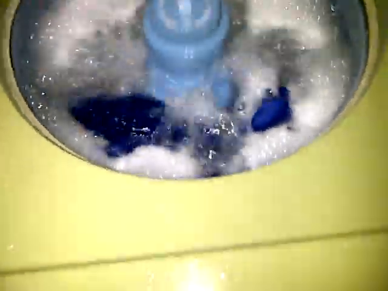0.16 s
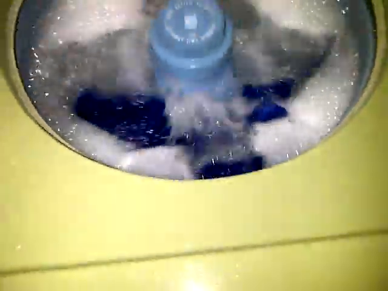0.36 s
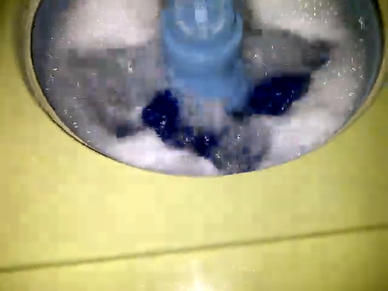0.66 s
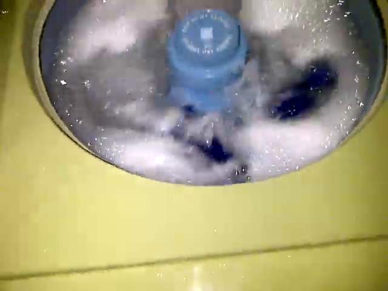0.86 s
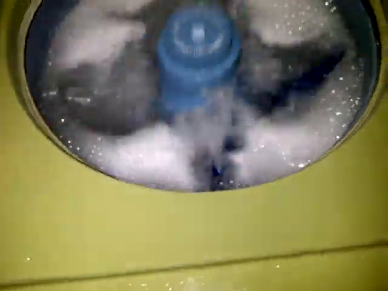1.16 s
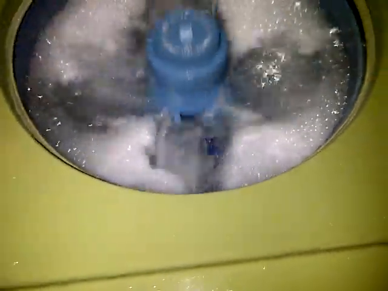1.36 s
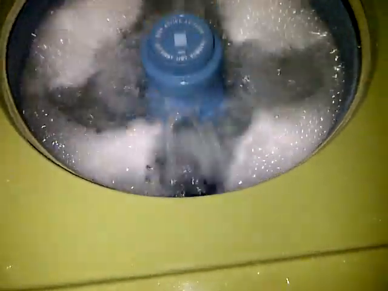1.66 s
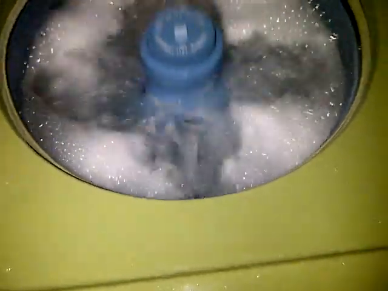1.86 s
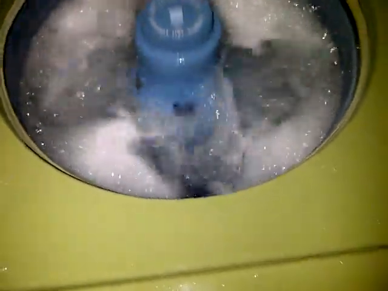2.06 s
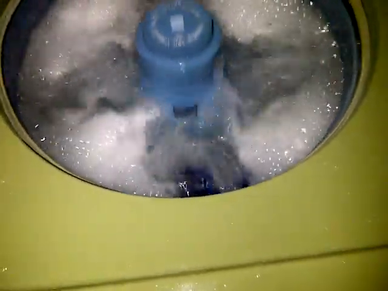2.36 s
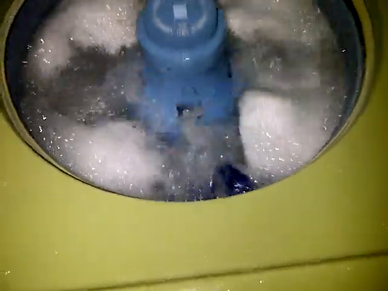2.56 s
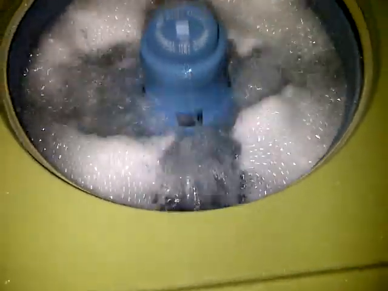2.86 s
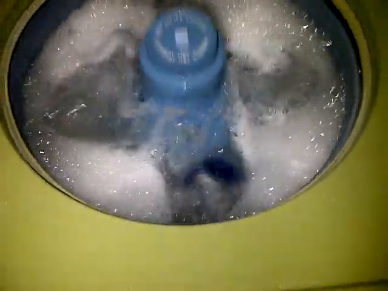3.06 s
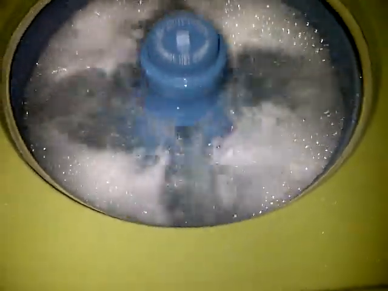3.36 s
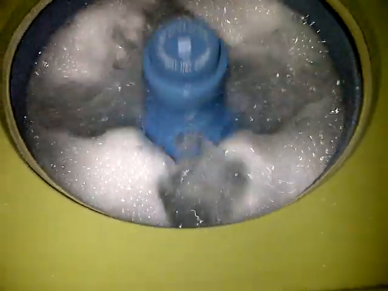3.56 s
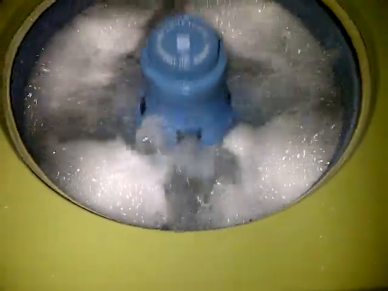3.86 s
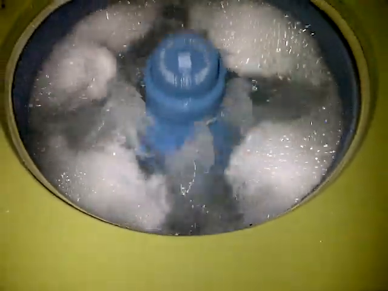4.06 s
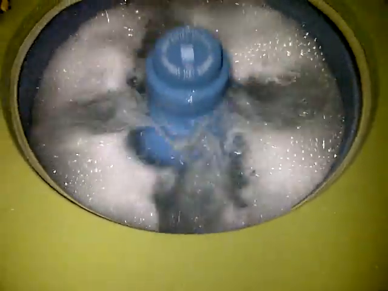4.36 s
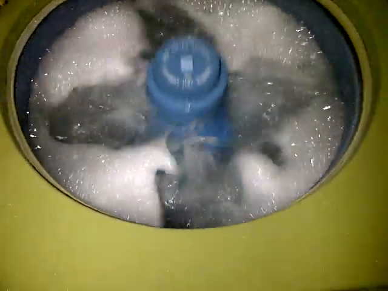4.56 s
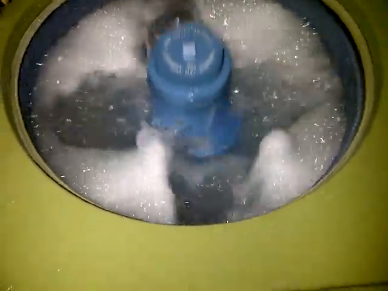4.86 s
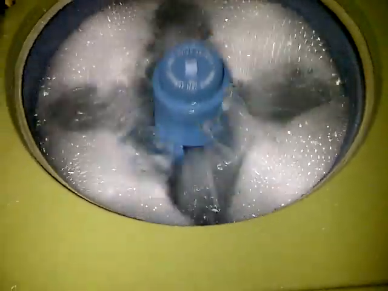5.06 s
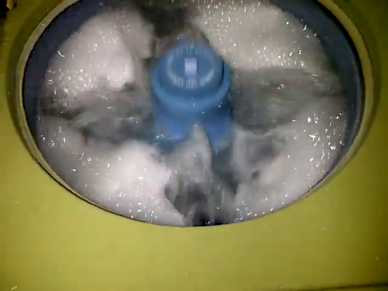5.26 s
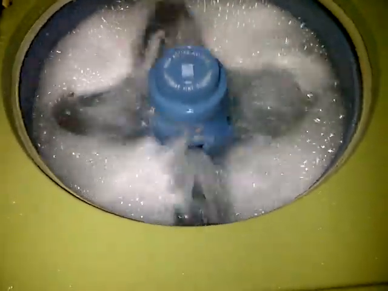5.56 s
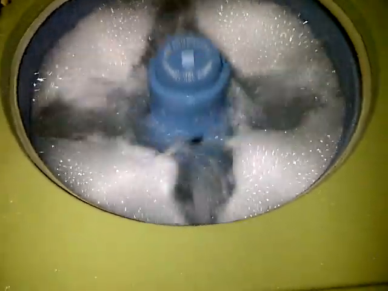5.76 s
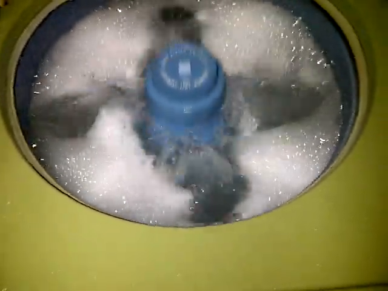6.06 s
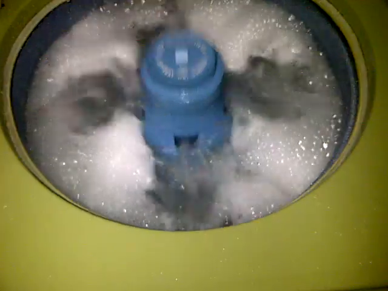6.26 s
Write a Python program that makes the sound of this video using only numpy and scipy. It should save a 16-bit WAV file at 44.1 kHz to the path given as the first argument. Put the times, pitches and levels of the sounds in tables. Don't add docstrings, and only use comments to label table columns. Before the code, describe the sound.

Close above an open washing machine tub, the agitator reverses about six times a second. Each stroke slaps up a short burst of spray and ringing droplets, followed by hollow glugs and small plops. Froth fizzes between strokes while a low gear drone and faint soft thumps continue underneath. Small indoor space, dull band-limited phone sound, steady from start to end.

```python
import sys
import numpy as np
from scipy import signal
from scipy.fft import rfft, irfft
from scipy.io import wavfile
from scipy.ndimage import uniform_filter1d

SR = 44100
rng = np.random.default_rng(int(sys.argv[2]) if len(sys.argv) > 2 else 0)


def nominal_scale(level):
    x = np.asarray(level, float) / 20
    return 10 ** x


def master_out(mix):
    frames = np.transpose(np.atleast_2d(mix))
    ceiling = np.clip(frames, -1, 1)
    pcm = np.round(ceiling * 32767).astype(np.int16)
    wavfile.write(sys.argv[1], SR, pcm)


N = 282681

# (time [s], peak level [dB], loudest droplet pitch [Hz], length [s],
# mist above 4.5 kHz [dB])
SPLASHES = [(0.099, -10.5, 1880, 0.028, -13), (0.163, -13.5, 1660, 0.025, -14),
            (0.237, -18, 2370, 0.018, -15), (0.2455, -13.5, 3470, 0.025, -10),
            (0.411, -15.5, 5680, 0.014, -14.5), (0.428, -7, 1500, 0.02, -6.5),
            (0.492, -16.5, 3200, 0.026, -11), (0.5758, -4.5, 1780, 0.026, -11.5),
            (0.681, -23, 2410, 0.02, -12.5), (0.71, -16, 2540, 0.015, -20.5),
            (0.739, -16, 2400, 0.019, -15), (0.7513, -11.5, 1900, 0.018, -20),
            (0.793, -20.5, 3840, 0.014, -18), (0.82, -15.5, 3220, 0.02, -10.5),
            (0.903, -8.5, 1550, 0.026, -13.5), (0.945, -22, 3100, 0.014, -15),
            (0.9745, -12.5, 4420, 0.017, -21), (0.998, -20, 2580, 0.015, -18),
            (1.058, -8, 2300, 0.027, -18), (1.096, -19.5, 1860, 0.014, -23.5),
            (1.204, -20, 2030, 0.02, -12), (1.2256, -8, 2470, 0.028, -13.5),
            (1.288, -16, 3970, 0.029, -12.5), (1.36, -22.5, 2950, 0.023, -2),
            (1.3714, -24, 3630, 0.019, -7), (1.3846, -7.5, 1600, 0.015, -22.5),
            (1.548, -6.5, 3040, 0.02, -15), (1.5743, -13.5, 2380, 0.02, -22.5),
            (1.708, -11, 2750, 0.027, -11.5), (1.846, -20.5, 3250, 0.024, -12),
            (1.873, -12.5, 2890, 0.013, -12), (1.8779, -7.5, 2310, 0.024, -16),
            (2.012, -20, 2450, 0.02, -6), (2.0197, -13.5, 3000, 0.02, -9), (2.043, -14, 2930, 0.02, -19.5),
            (2.1131, -16, 3550, 0.02, -17.5), (2.178, -16, 2400, 0.013, -15.5),
            (2.195, -9.5, 2430, 0.02, -12.5), (2.34, -17.5, 2950, 0.018, -8.5),
            (2.368, -7.5, 4060, 0.013, -12), (2.4363, -16, 2470, 0.02, -11), (2.5214, -8, 1840, 0.029, -10),
            (2.585, -23.5, 2580, 0.02, -6), (2.598, -13, 3700, 0.022, -4.5), (2.658, -21, 3300, 0.02, -21),
            (2.681, -9, 1580, 0.016, -11), (2.7047, -12.5, 1530, 0.024, -21), (2.826, -26, 1830, 0.02, 1.5),
            (2.837, -14, 4300, 0.014, -5), (2.8436, -17.5, 1680, 0.016, -22),
            (2.865, -11, 2960, 0.015, -20.5), (2.922, -16.5, 2000, 0.027, -4.5),
            (2.9926, -15.5, 2880, 0.016, -13.5), (3.0063, -4.5, 1970, 0.013, -10),
            (3.087, -15.5, 3400, 0.022, -13), (3.127, -20.5, 2730, 0.017, -25),
            (3.1795, -20.5, 2260, 0.023, -12), (3.1845, -12.5, 2740, 0.02, -6.5),
            (3.252, -19, 2220, 0.02, -6.5), (3.3288, -6, 1950, 0.02, -13),
            (3.4344, -16.5, 2400, 0.023, -8.5), (3.502, -11, 2960, 0.015, -14.5),
            (3.6615, -5.5, 3080, 0.022, -11.5), (3.7416, -12.5, 4450, 0.026, -15),
            (3.8314, -6, 1910, 0.015, -17.5), (3.871, -38, 2020, 0.02, -12),
            (3.907, -21.5, 1630, 0.017, -21), (3.983, -7, 2220, 0.026, -10.5),
            (4.015, -12.5, 1940, 0.022, -27), (4.0622, -18, 2980, 0.022, -4.5),
            (4.1475, -9.5, 2340, 0.013, -21), (4.224, -16, 3010, 0.015, -14),
            (4.315, -5.5, 2500, 0.018, -16.5), (4.381, -15.5, 3520, 0.024, -16.5),
            (4.4696, -11, 2700, 0.022, -14.5), (4.502, -7.5, 1660, 0.018, -25.5),
            (4.559, -17.5, 3850, 0.014, -7), (4.642, -6.5, 1530, 0.02, -12),
            (4.666, -11.5, 1700, 0.014, -21), (4.7076, -12, 1860, 0.02, -11),
            (4.774, -19.5, 2040, 0.018, -3.5), (4.789, -10.5, 3100, 0.017, -14),
            (4.855, -16.5, 1960, 0.018, -15.5), (4.968, -4.5, 3120, 0.023, -20),
            (5.049, -16.5, 3200, 0.017, -6), (5.1182, -4, 2200, 0.025, -12.5),
            (5.193, -20, 1540, 0.014, -5.5), (5.263, -16.5, 2640, 0.02, -23.5),
            (5.28, -9.5, 2360, 0.016, -13.5), (5.301, -7, 1720, 0.016, -26.5),
            (5.344, -14.5, 1900, 0.018, -17), (5.4504, -8, 1600, 0.023, -16.5),
            (5.535, -24, 1530, 0.02, -4), (5.6064, -8.5, 1780, 0.024, -20),
            (5.6867, -12.5, 4240, 0.014, -11), (5.7725, -10.5, 2500, 0.016, -20.5),
            (5.782, -20.5, 3050, 0.018, -15), (5.7954, -9, 1580, 0.016, -24), (5.937, -7, 1560, 0.02, -21),
            (5.985, -20.5, 3900, 0.02, -11), (6.01, -31, 4130, 0.017, -18), (6.096, -27, 2150, 0.022, -13),
            (6.105, -10, 1690, 0.022, -28.5), (6.179, -16.5, 1800, 0.015, -26.5),
            (6.257, -2.5, 4260, 0.024, -15), (6.3616, -18, 2980, 0.015, -16.5)]
# (time [s], peak level [dB], pitch [Hz], t60 [s])
AIR_POCKETS = [(0.027, -16, 440, 0.068), (0.097, -14, 455, 0.06), (0.116, -9, 776, 0.093),
               (0.17, -13, 997, 0.1), (0.213, -12, 644, 0.076), (0.25, -11, 594, 0.027),
               (0.291, -13.5, 630, 0.14), (0.415, -12.5, 437, 0.14), (0.447, -4, 705, 0.036),
               (0.481, -14, 570, 0.074), (0.576, -21, 439, 0.026), (0.629, -9.5, 460, 0.034),
               (0.672, -8, 523, 0.024), (0.741, -9, 590, 0.09), (0.755, -6, 580, 0.031),
               (0.768, -4.5, 530, 0.032), (0.816, -17, 766, 0.043), (1.057, -15.5, 583, 0.17),
               (1.211, -35, 366, 0.07), (1.228, -8, 460, 0.052), (1.269, -13, 605, 0.054),
               (1.328, -15, 440, 0.069), (1.386, -13.5, 566, 0.076), (1.412, -10.5, 580, 0.12),
               (1.46, -10.5, 640, 0.048), (1.55, -19, 430, 0.06), (1.57, -11.5, 634, 0.06),
               (1.715, -9, 530, 0.038), (1.731, -8.5, 832, 0.11), (1.797, -13.5, 810, 0.045),
               (1.896, -9.5, 454, 0.047), (1.92, -22, 447, 0.037), (2.041, -14.5, 675, 0.12),
               (2.088, -13.5, 455, 0.084), (2.203, -6, 430, 0.073), (2.336, -17, 450, 0.039),
               (2.36, -13, 454, 0.17), (2.52, -19, 540, 0.047), (2.558, -13.5, 526, 0.046),
               (2.597, -13.5, 400, 0.039), (2.706, -25, 447, 0.06), (2.763, -18.5, 470, 0.084),
               (2.857, -5, 700, 0.039), (2.884, -4, 646, 0.065), (2.931, -7.5, 517, 0.03),
               (3.03, -16.5, 664, 0.07), (3.138, -16, 350, 0.052), (3.177, -7, 576, 0.049),
               (3.208, -10, 643, 0.06), (3.25, -16.5, 600, 0.097), (3.331, -30, 470, 0.06),
               (3.503, -10, 570, 0.06), (3.511, -12.5, 1000, 0.052), (3.572, -8.5, 730, 0.039),
               (3.631, -17, 640, 0.038), (3.667, -10, 410, 0.054), (3.688, -7, 662, 0.056),
               (3.742, -13, 500, 0.047), (3.826, -13, 555, 0.16), (3.899, -10, 920, 0.02),
               (3.975, -10, 746, 0.024), (4.061, -14.5, 635, 0.08), (4.15, -10.5, 455, 0.067),
               (4.176, -9, 840, 0.05), (4.231, -17.5, 520, 0.18), (4.318, -8.5, 439, 0.1),
               (4.47, -5.5, 455, 0.034), (4.501, -13.5, 635, 0.1), (4.535, -11.5, 662, 0.099),
               (4.638, -15.5, 482, 0.041), (4.662, -4.5, 544, 0.025), (4.716, -15, 430, 0.06),
               (4.795, -13, 430, 0.11), (4.839, -10.5, 443, 0.089), (4.968, -9, 740, 0.06),
               (5.104, -31, 496, 0.055), (5.121, -15, 523, 0.14), (5.192, -8, 530, 0.044),
               (5.286, -14.5, 285, 0.036), (5.286, -20, 675, 0.048), (5.308, -12.5, 744, 0.096),
               (5.46, -21, 1290, 0.06), (5.461, -10, 438, 0.074), (5.476, -5.5, 515, 0.047),
               (5.531, -12.5, 627, 0.055), (5.593, -18, 450, 0.096), (5.609, -9.5, 441, 0.064),
               (5.651, -8.5, 602, 0.067), (5.684, -11.5, 840, 0.052), (5.739, -14, 420, 0.072),
               (5.775, -10.5, 537, 0.078), (5.824, -7, 450, 0.023), (5.847, -16.5, 456, 0.042),
               (5.932, -12, 452, 0.1), (5.963, -11.5, 823, 0.073), (5.999, -15.5, 1050, 0.048),
               (6.018, -13.5, 440, 0.065), (6.096, -3.5, 460, 0.034), (6.256, -10.5, 455, 0.14),
               (6.345, -8.5, 644, 0.035)]
# (time [s], peak level [dB], pitch [Hz], t60 [s])
WAKE_POCKETS = [(0.422, -19, 999, 0.034), (1.06, -14, 1084, 0.045), (1.294, -19, 1090, 0.046),
                (1.389, -16, 1200, 0.059), (1.413, -9, 880, 0.033), (1.552, -15, 1020, 0.05),
                (1.716, -12, 1080, 0.037), (1.882, -21, 1204, 0.04), (2.682, -16, 1190, 0.04),
                (2.855, -22, 790, 0.032), (3.008, -23, 1130, 0.04), (3.177, -21, 1150, 0.033),
                (3.251, -15, 1120, 0.045), (3.513, -10, 1050, 0.063), (3.666, -21, 1340, 0.043),
                (3.9, -11, 885, 0.048), (3.988, -11, 814, 0.05), (4.639, -14, 1150, 0.035),
                (5.144, -13, 1140, 0.034), (5.287, -17, 1070, 0.029), (5.478, -12, 1150, 0.033),
                (5.846, -15.5, 1180, 0.04), (5.942, -17, 804, 0.036), (6.0, -17, 1130, 0.027)]
# (frequency [Hz], level per Hz [dB])
SPRAY_SPECTRUM = [(180, -15.5), (300, -14.5), (526, -5.5), (1410, -11.5), (1850, -9), (3160, -8.5),
                  (5930, -12), (7180, -11), (7900, -7.5), (10300, -47.5), (17400, -120)]
# (frequency [Hz], level per Hz [dB])
CHURN_SPECTRUM = [(12, -68), (20, -34.5), (118, -40), (232, 0.5), (277, 1), (338, -3), (445, -2), (504, -2),
                  (681, 1.5), (919, -10.5), (1150, -9), (1440, -17), (3130, -15), (7150, -24),
                  (7900, -19.5), (10300, -71.5), (17400, -120)]
# (time [s], level [dB])
CHURN_LEVEL = [
    (0.0, -27.5),
    (1.45, -27),
    (2.93, -27.5),
    (4.46, -28),
    (4.68, -27.5),
    (5.07, -26.5),
    (5.87, -27.5),
    (6.41, -27),
]
# (frequency [Hz], bandwidth [Hz], level [dB])
TUB_MODES = [(182, 35, -50), (222.8, 48, -42), (262.5, 48, -38.5), (436, 56, -33), (605, 87, -46)]
# (frequency [Hz], gain [dB])
BAND_EDGE = [(7300, -2.5), (7800, -8.5), (8000, -33), (8250, -14.5), (8700, -24.5), (9200, -48),
             (9600, -82)]

STROKE_S, LULL_S = .16235, .052
PHONE_HZ = 16000


def splashes():
    spray = droplets(560, 6740, per_s=6000, cycles=11.6, spread_db=2.52)
    spray = spray + .6 * rng.standard_normal(N)
    spray = evened(patchy(colour(spray, SPRAY_SPECTRUM), 2.93, frames=3, bins=4))
    mist = colour(spray, [(3500, -68.5), (5000, -1.5)])
    heavy = colour(np.roll(spray, SR), [(500, -16), (800, 5), (1800, 4), (3000, -27)])
    out = np.zeros(N)
    for s, db, hz, length, mist_db in SPLASHES:
        length = np.clip(length, .003, .06)
        t = np.arange(int((length + 0.11) * SR)) / SR
        at = (round(s * SR) + np.arange(len(t))) % N
        clump = spray[at] + (nominal_scale(mist_db + 12.5) - 1) * mist[at]
        clump = clump / np.sqrt(np.mean(clump[t < length] ** 2))
        clump = clump + 0.87 * resonate(clump, hz, 550)
        swell = np.sin(np.pi / 2 * np.minimum(t / (0.35 * length), 1))
        shape = swell * (np.exp(-(t / length) ** 4) + 0.1 * np.exp(-t / 0.051))
        fall = t / 0.017 * np.exp(1 - t / 0.015)
        slap = shape * clump + 0.47 * fall * heavy[at]
        add(out, max(s - .0015, 0), nominal_scale(db - 13) * slap)
        first_drop = bubble(hz, 0.014, glide=0.26, rise=0.0018)
        add(out, s, nominal_scale(db - 12) * first_drop)
    return out


def glugs():
    slosh = droplets(392, 2150, per_s=2500, cycles=11.2, spread_db=3.2)
    pockets = AIR_POCKETS + WAKE_POCKETS
    out, luck = np.zeros(N), rng.uniform(-1.01, 1, (len(pockets), 2))
    for (s, db, hz, t60), (detune, late) in zip(pockets, luck):
        t60 = np.clip(t60, .015, .2)
        t = np.arange(int(t60 * SR)) / SR
        burst = bubble(.97 * hz, 0.84 * t60, glide=0.14, rise=0.00085)
        follower = bubble(hz * (1 + .3 * detune), 0.59 * t60, glide=0.15, rise=0.0017)
        cluster = slosh[(round(s * SR) + np.arange(len(t))) % N]
        cluster = evened(0.18 * cluster + resonate(cluster, 1.135 * hz, 230))
        cluster_shape = (1 - np.exp(-t / 0.0037)) * np.exp(-(t / (0.37 * t60)) ** 2)
        add(out, s, nominal_scale(db - 4.0) * burst)
        add(out, s + 0.007954 + 0.00393 * late, nominal_scale(db - 12) * follower)
        add(out, s, nominal_scale(db - 13.5) * cluster * cluster_shape)
    return out


def churn():
    real, imaginary, patches = rng.standard_normal((N // 128 + 6, 257, 3)).T
    patches = evened(uniform_filter1d(uniform_filter1d(patches, 8, 0), 6, 1))
    froth = (real + 1j * imaginary) * nominal_scale(1.83 * patches)
    hiss = evened(signal.istft(froth, nperseg=512, noverlap=384)[1][:N])
    gurgle = droplets(198.2, 1252, per_s=500, cycles=22.8, spread_db=4.3) * stroke(2.23, 1.0)
    fizz = droplets(894, 7000, per_s=1600, cycles=26, spread_db=3.85) * stroke(3.3, 2.5)
    water = hiss * stroke(1.1, 0.5) + nominal_scale(-11.5) * gurgle + nominal_scale(-2) * fizz
    level_db = np.interp(np.arange(N) / SR, *np.transpose(CHURN_LEVEL))
    return nominal_scale(level_db + 3.0) * evened(colour(water, CHURN_SPECTRUM))


def tub():
    out = np.zeros(N)
    for hz, width, db in TUB_MODES:
        shake = rng.standard_normal(N)
        mode = resonate(resonate(shake, hz, width), hz, width)
        out += nominal_scale(db) * evened(mode)
    out *= stroke(2.2, 0.93)
    t = np.arange(int(.085 * SR)) / SR
    thump = np.hanning(len(t)) * np.sin(2 * np.pi * 69 * t)
    for k in range(-1, int(N / SR / STROKE_S) + 1):
        thump_db = -19.5 + 1.5 * rng.standard_normal()
        add(out, max(.15 + k * STROKE_S, 0), nominal_scale(thump_db) * thump)
    return out


def laundry_room(x):
    t = np.arange(int(.12 * SR)) / SR
    signs = np.sign(rng.standard_normal(len(t)))
    arrivals = rng.random(len(t)) < 2000 / SR
    taps = signs * arrivals * nominal_scale(-60 * t / 0.3)
    return signal.oaconvolve(x, taps / np.linalg.norm(taps))[:N]


def stroke(lull_db, second_db):
    turn = 2 * np.pi * (np.arange(N) / SR - LULL_S) / STROKE_S
    return nominal_scale(-lull_db * np.cos(turn + .5) - second_db * np.cos(2 * turn - .8))


def droplets(low_hz, high_hz, per_s, cycles, spread_db, count=24):
    out = np.zeros(N)
    for hz in np.geomspace(low_hz, high_hz, count):
        chance, size = rng.random(N), rng.exponential(1, N)
        train = (chance < per_s / count / SR) * nominal_scale(spread_db * np.minimum(size, 4))
        grain = bubble(hz, cycles / hz, glide=0.42, rise=.5 / hz)
        grain = grain / np.linalg.norm(grain) * np.sqrt(hz)
        out += signal.oaconvolve(train, grain)[:N]
    return evened(out)


def bubble(hz, t60, glide, rise):
    t = np.arange(int(t60 * SR) + 8) / SR
    shape = (1 - np.exp(-t / rise)) * nominal_scale(-60 * t / t60)
    return shape / shape.max() * np.sin(2 * np.pi * hz * (t + glide * t ** 2 / (2 * t60)))


def resonate(x, hz, width):
    turn = np.exp(2j * np.pi * hz * np.arange(len(x)) / SR)
    r = np.exp(-np.pi * width / SR)
    return 2 * (turn * signal.lfilter([1 - r], [1, -r], x / turn)).real


def patchy(x, depth_db, frames, bins):
    z = signal.stft(x, nperseg=128)[2]
    patches = uniform_filter1d(rng.standard_normal(z.shape), frames, 1)
    patches = evened(uniform_filter1d(patches, bins, 0))
    return signal.istft(z * nominal_scale(depth_db * patches), nperseg=128)[1][:len(x)]


def colour(x, points):
    f, db = np.transpose(points)
    hz = np.fft.rfftfreq(len(x), 1 / SR)
    gain = nominal_scale(np.interp(np.log(hz + 1), np.log(f + 1), db))
    return irfft(rfft(x) * gain, len(x))


def evened(x):
    return x / np.sqrt(np.mean(x ** 2) + 1e-20)


def add(mix, s, sound):
    part = mix[round(s * SR):][:len(sound)]
    part += sound[:len(part)]


def scene():
    events = splashes() + glugs()
    return (events + nominal_scale(-12.5) * laundry_room(events) + churn() + tub())[None]


def top_cut(x):
    return signal.sosfilt(signal.butter(12, 9050, fs=SR, output="sos"), x)


def record(dry):
    x = signal.sosfilt(signal.butter(6, 150, "high", fs=SR, output="sos"), dry[0])
    rumble = colour(rng.standard_normal(N), [(15, 3.5), (110, 6.0), (200, -27), (400, -85)])
    x = x + nominal_scale(-65) * evened(rumble)
    x = colour(x, [(PHONE_HZ / 2 - 10, 0), (PHONE_HZ / 2, -200)])
    mirror = 2 * x * np.cos(2 * np.pi * PHONE_HZ * np.arange(N) / SR)
    mix = colour(x + mirror, BAND_EDGE)[None]
    return top_cut(mix)


dry = scene()
out = record(dry)
master_out(out)
```